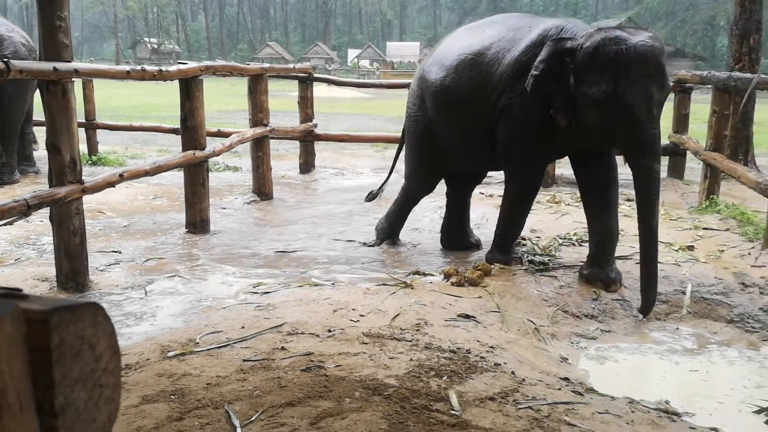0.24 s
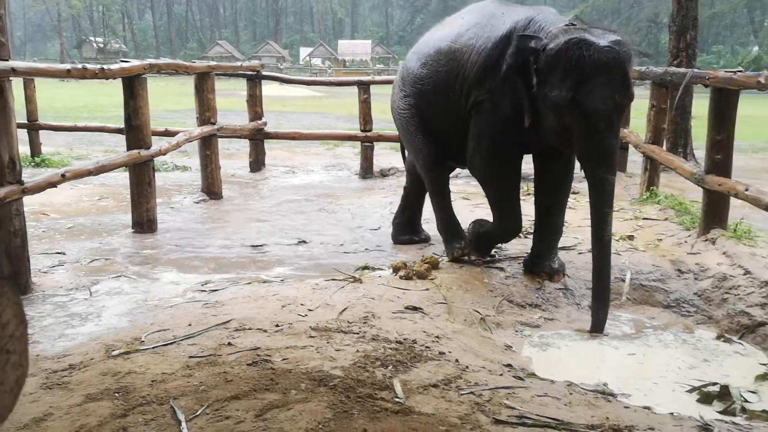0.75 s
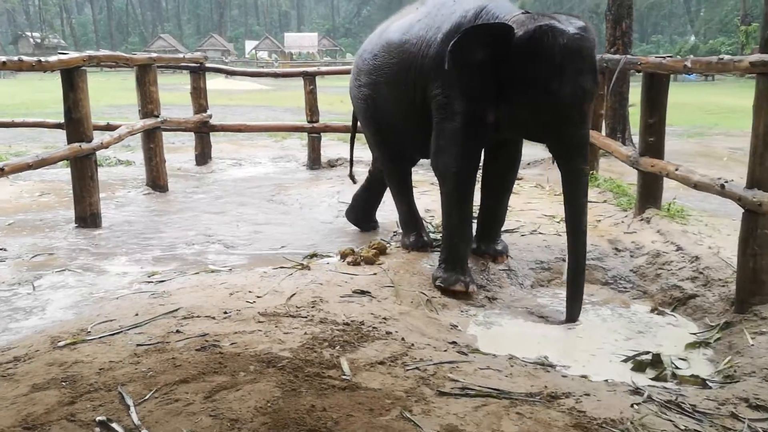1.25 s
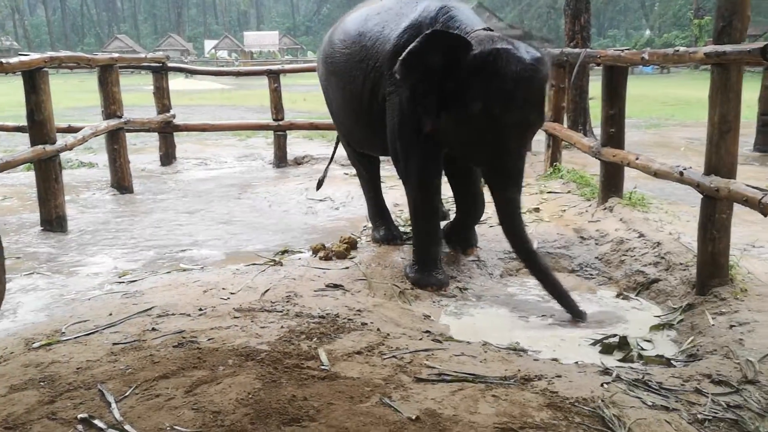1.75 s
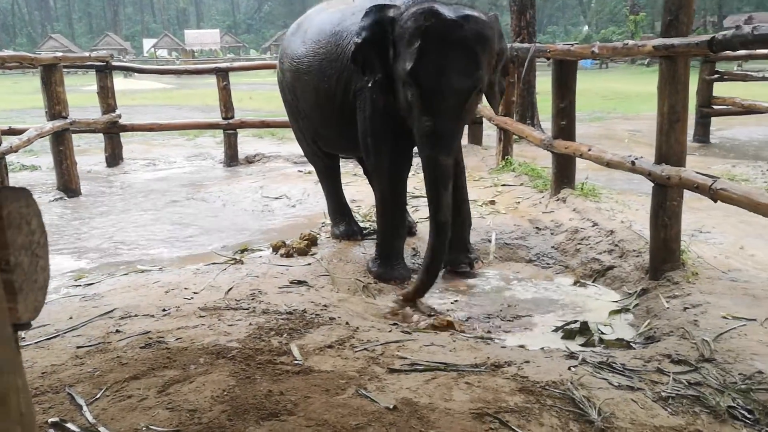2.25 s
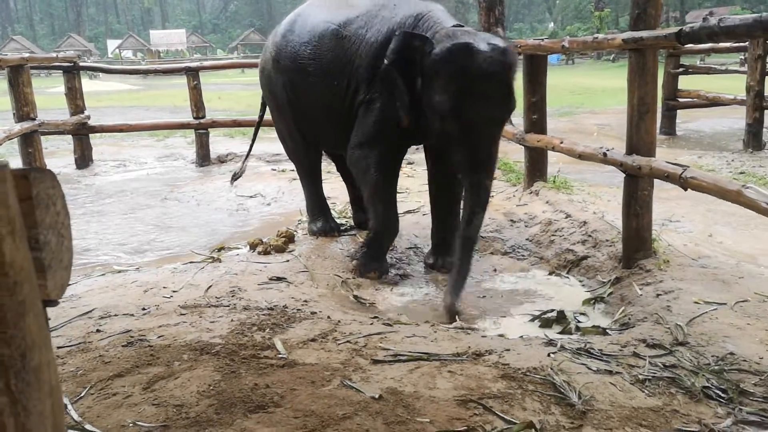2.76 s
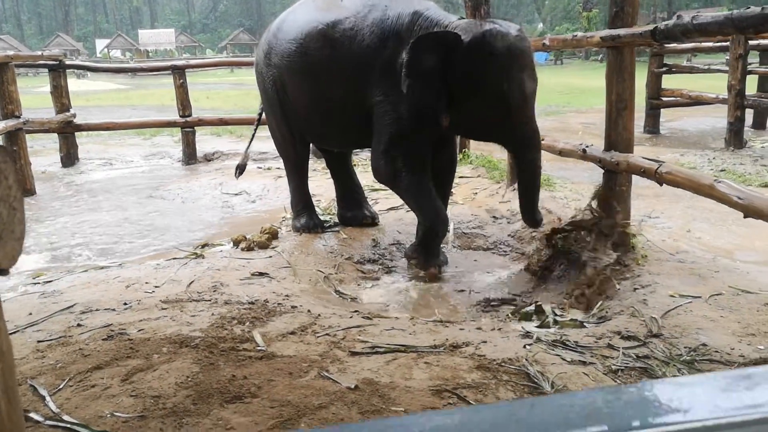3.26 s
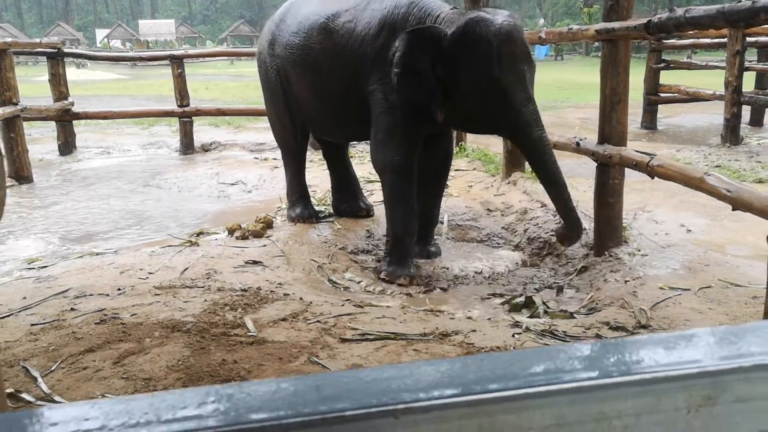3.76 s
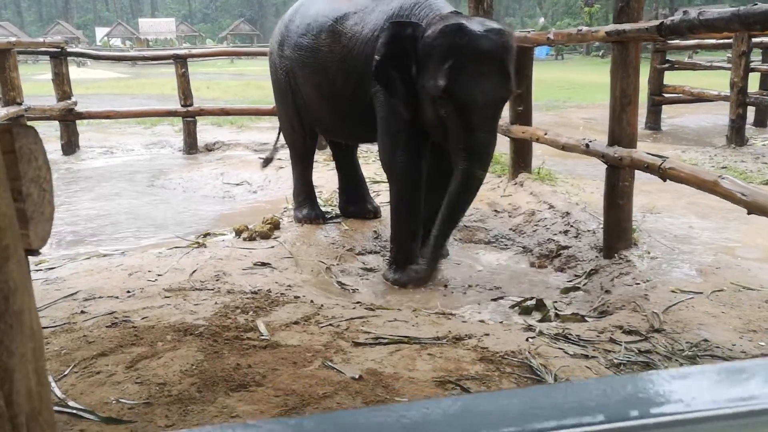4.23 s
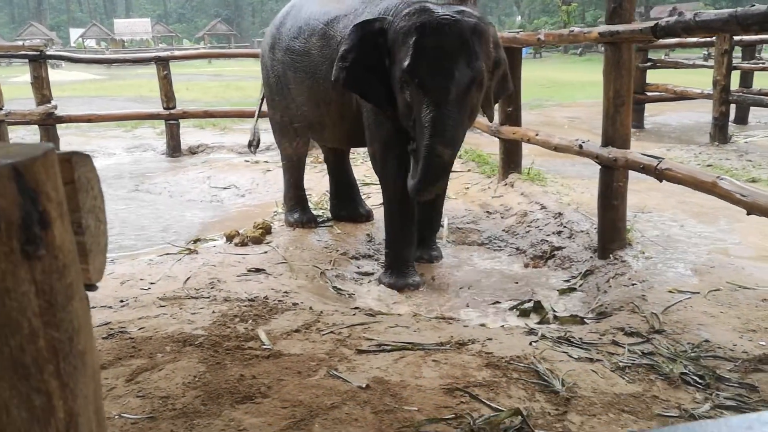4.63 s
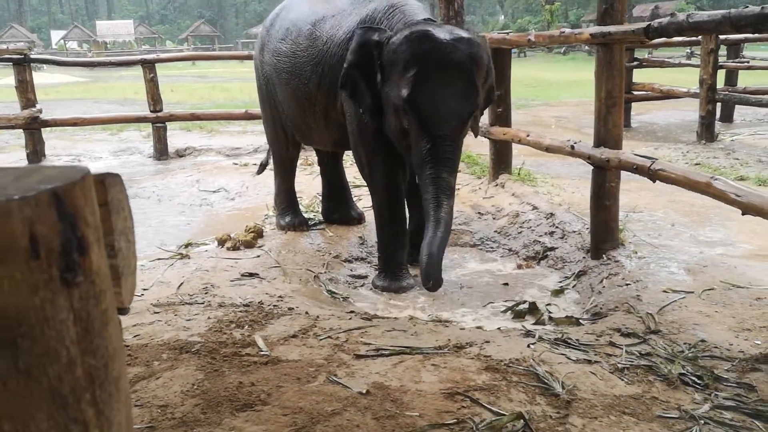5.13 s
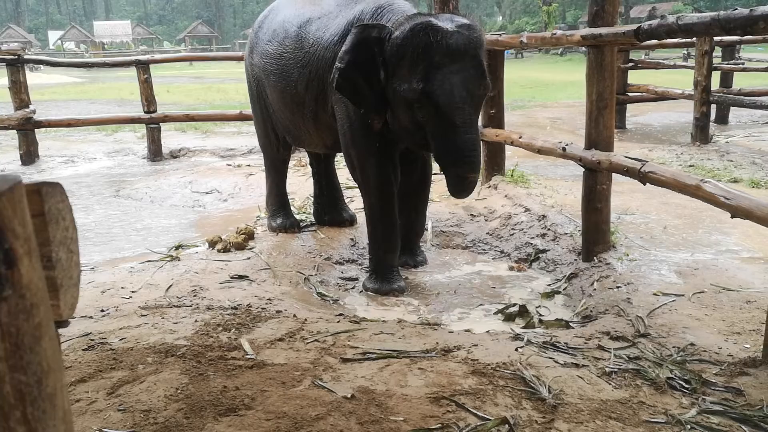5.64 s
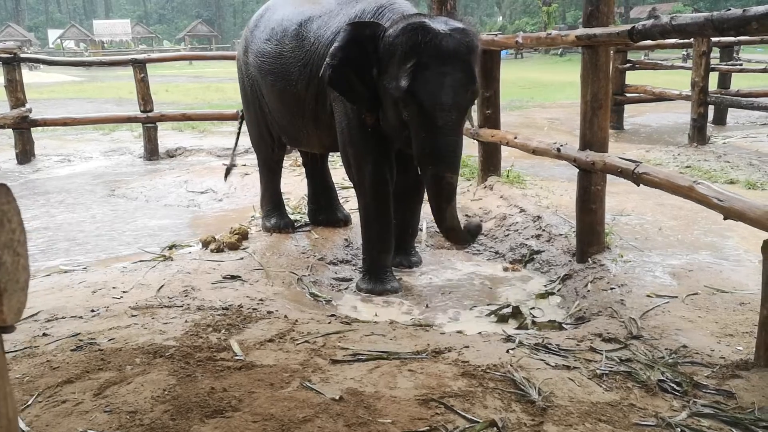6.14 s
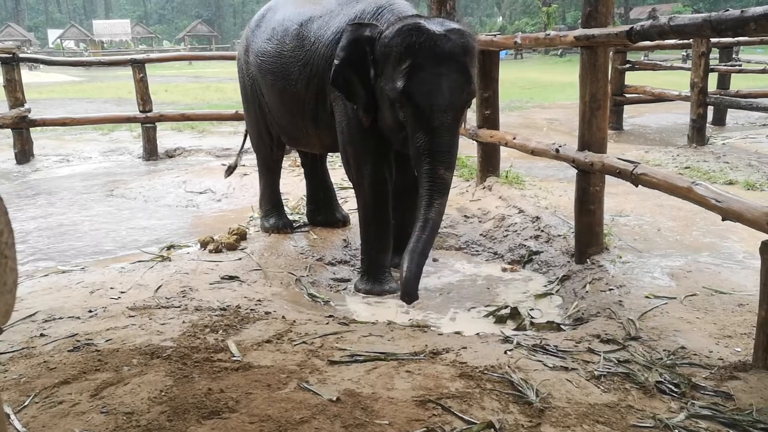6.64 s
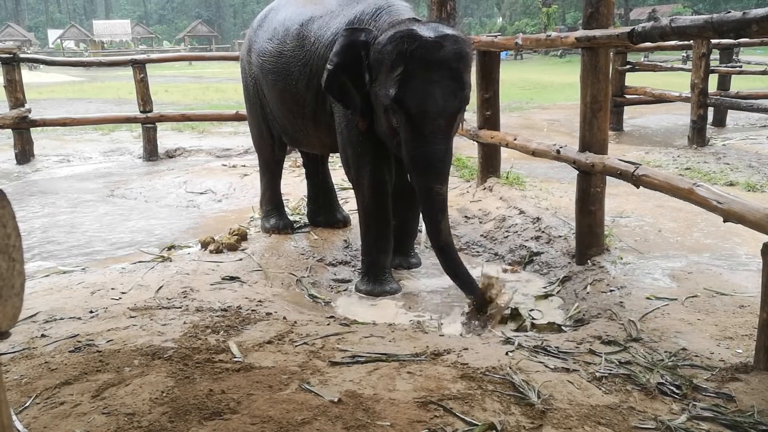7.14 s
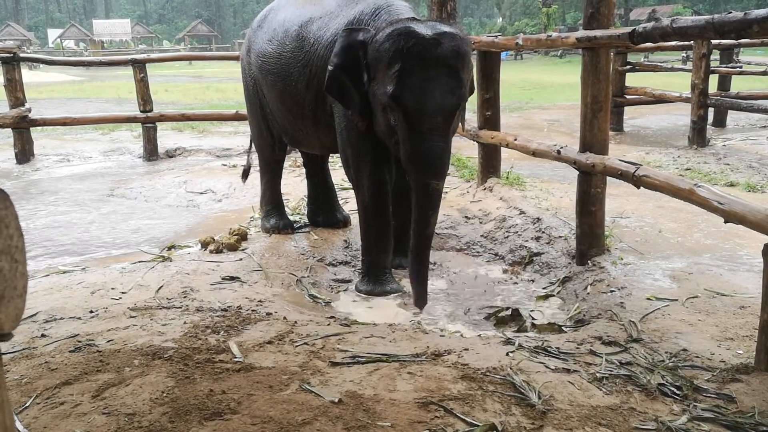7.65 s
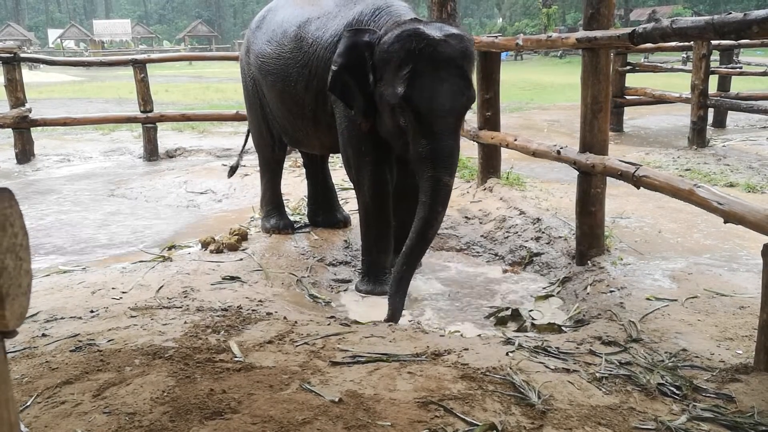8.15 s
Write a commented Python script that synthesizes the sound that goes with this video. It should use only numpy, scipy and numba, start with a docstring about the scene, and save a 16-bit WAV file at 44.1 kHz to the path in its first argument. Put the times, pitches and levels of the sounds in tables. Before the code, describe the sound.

Even rainfall on wet muddy ground, crackling close drops and soft mud plops, over a constant engine hum and unsteady deep rumble.

```python
"""Steady rain hisses on mud and puddles, over a generator hum and an unsteady low rumble.
Coloured noise makes the far rain; clusters of short dying sines make the near patter and the splats.
Single plops, soft mud thuds and a few pitched plinks stand out; they too are bursts of dying sines.
The six-cylinder generator is a sum of shaft-rate harmonics, the rumble three bands of noise.
A phone with two ports hears it all from under a shelter."""
import sys
import numpy as np
from scipy import signal
from scipy.fft import rfft, irfft, next_fast_len
from scipy.io import wavfile
from scipy.ndimage import uniform_filter1d
from numba import njit

SR = 44100
rng = np.random.default_rng(int(sys.argv[2]) if len(sys.argv) > 2 else 0)


def wrap_up_sound(samples):
    """Save the sound to the file named by the first command line argument, as 16-bit audio."""
    columns = np.atleast_2d(samples).T
    # keep every value between -1 and 1, then stretch to whole-number steps
    tamed = np.clip(columns, -1, 1)
    steps = np.round(tamed * 32767).astype(np.int16)
    wavfile.write(sys.argv[1], SR, steps)


N = 369999  # length in samples

# colour of the rain through the phone's ports: [f/Hz, relative level/dB]
RAIN_COLOUR = [(240, -21), (340, -11), (577, -12.5), (957, -5.5), (1420, -6), (2190, 0), (2670, -1.5),
               (3250, -6.5), (3620, -7), (7790, -1), (9350, -5), (11800, -19), (13100, -16.5), (14600, -23),
               (15500, -31)]
# balance of the ports for rain: [f/Hz, left minus right level/dB]
PORT_BALANCE = [(400, -.5), (700, -1.1), (1300, -3), (2400, -5), (4400, -2.3), (8000, .5), (11500, -.5),
                (14000, -.9)]
# multiples of the generator's shaft rate: [multiple, rms level/dB, left lead/rad]
HARMONICS = [(2, -54, -.05), (3, -31.1, -.07), (4, -56, -.2), (7, -65, -.4), (8, -66, -.4), (9, -58, -.4),
             (10, -66, -.3), (12, -67, -.2), (15, -70, -.2)]
# second firing harmonic, which swells and sinks: [t/s, rms level/dB]
FIRING_OVERTONE = [(0.0, -53), (0.04, -41.5), (2.1, -38), (2.41, -39), (3.34, -37.5), (3.39, -35),
                   (3.72, -40), (3.79, -35), (4.84, -40), (7.71, -41.5), (8.34, -39.5), (8.39, -43)]
# unsteady low rumble: [t/s, deep band level/dB, middle band level/dB, upper band level/dB]
RUMBLE_LEVELS = [(0.0, -39, -55, -48), (0.04, -37, -44, -56), (0.21, -39, -53, -47), (0.28, -46, -44, -56),
                 (0.33, -32, -45, -49), (0.54, -44, -52, -50.5), (0.65, -39, -45, -53),
                 (0.72, -37, -55, -50), (0.86, -41, -45, -48), (0.89, -52, -59, -54),
                 (1.05, -30.5, -41, -50), (1.52, -47, -53, -51.5), (1.78, -38, -50, -45.5),
                 (1.82, -42, -60, -50), (1.87, -45, -53, -50), (2.41, -49, -51, -47.5),
                 (2.48, -31, -46, -52), (2.55, -43, -50, -57), (2.59, -42, -46, -46),
                 (2.71, -32.5, -45, -53), (2.85, -45, -48, -47), (3.04, -31.5, -37, -52),
                 (3.35, -34, -39, -48.5), (3.62, -39, -43, -44.5), (3.76, -40, -32, -45),
                 (3.83, -45, -62, -42), (3.88, -39, -43, -43), (4.11, -42, -51, -49), (4.19, -34, -42, -42),
                 (4.4, -43, -53, -47.5), (4.88, -41, -51, -47), (5.09, -41, -39, -49),
                 (5.14, -41, -53, -49), (6.05, -41, -45, -50.5), (6.29, -34, -42, -51),
                 (6.55, -41, -48, -51.5), (7.74, -43, -48, -50.5), (8.11, -41, -44, -51),
                 (8.16, -36, -56, -49), (8.23, -35, -43, -53), (8.39, -42, -50, -49)]
# rumble bands: [centre f/Hz, width f/Hz, opposed noise relative to shared noise]
RUMBLE_SHAPES = [(35, 86, 0.13), (100, 95, 0.39), (203, 247, 0.24)]
# big drops slapping wet ground nearby:
# [t/s, peak level/dB, centre f/Hz, left minus right level/dB, mean droplet delay/ms]
BIG_SPLATS = [(0.1102, -21.0, 5430.0, -2, 1.7), (0.5089, -19, 5910.0, -3, 2.1),
              (0.5511, -20.0, 7490.0, 1, 1.1), (0.8506, -16.5, 7460.0, 6, 2.6),
              (0.8762, -23.0, 7210.0, 4, 3.8), (0.9068, -20, 5890.0, 0, 5.7),
              (0.9625, -17.5, 5500.0, 0, 1.9), (1.1557, -24, 7680.0, 8, 0.8),
              (1.3459, -13, 5850.0, -3, 2.0), (1.3637, -23, 7060.0, 2, 2.5),
              (1.4412, -22.0, 7850.0, 2, 2.0), (1.5074, -20.0, 7260.0, 4, 1.3),
              (1.5863, -14.0, 6840.0, -1, 1.1), (1.7312, -22.0, 7390.0, 5, 2.3),
              (1.9192, -21, 7540.0, -3, 1.5), (1.9802, -20.0, 6940.0, 0, 1.4), (2.025, -14, 6850.0, 1, 2.0),
              (2.2065, -21.0, 5780.0, 1, 3.9), (2.3628, -12.5, 6000, -3, 2.8), (2.425, -15, 6630, -7, 1.4),
              (2.5628, -22.0, 5540.0, -3, 3.7), (2.5832, -23.0, 7030.0, 6, 0.9),
              (2.6056, -19, 7020.0, -4, 1.6), (2.6546, -24, 6600.0, 0, 2.3),
              (2.9948, -16.5, 6950.0, -4, 1.8), (3.1427, -20.0, 7270.0, -4, 1.9),
              (3.1528, -23, 6270.0, -4, 2.5), (3.2994, -21, 6130.0, -1, 2.7), (3.4949, -20, 5420.0, 1, 1.7),
              (3.6182, -18, 7060, 0, 6.3), (3.6521, -21.0, 6940.0, 0, 3.3), (3.68, -21, 6710.0, -4, 2.2),
              (3.6975, -17, 7500.0, 8, 0.8), (3.7434, -22, 7650.0, 6, 1.5),
              (3.8526, -23.0, 6100.0, -4, 2.4), (3.9138, -19, 6850.0, -3, 4.5),
              (3.941, -20.0, 6370.0, -2, 1.6), (3.9874, -23.0, 6080.0, -3, 2.3),
              (4.0496, -21.0, 5900.0, -2, 0.9), (4.0655, -22, 7320.0, 8, 2.5),
              (4.1818, -19, 7640.0, 2, 0.9), (4.3123, -22.0, 8060.0, 2, 1.9),
              (4.3763, -23.0, 6220.0, -9, 2.1), (4.4363, -18, 7580.0, 4, 2.4),
              (4.5512, -20, 6890.0, -4, 0.8), (4.5694, -21.0, 7490.0, 4, 1.7),
              (4.6371, -20.5, 5520.0, 1, 2.4), (4.6524, -19, 6530.0, 3, 2.3), (4.6907, -22, 7910.0, 9, 1.4),
              (4.7856, -21, 5620.0, -8, 1.3), (4.8068, -21, 6100.0, 0, 2.6), (4.9037, -20, 6900.0, 2, 2.4),
              (4.9185, -18, 7030.0, 1, 2.3), (4.9436, -22.0, 7190.0, 5, 1.0), (5.0761, -22, 6160.0, 3, 2.1),
              (5.0828, -22.0, 7000.0, 0, 3.0), (5.0952, -19.0, 6350.0, 1, 2.3),
              (5.1061, -20, 5640.0, -1, 2.1), (5.2241, -19.5, 7510.0, 2, 3.1),
              (5.2873, -19.0, 6590.0, -5, 1.8), (5.7067, -21, 7470.0, -1, 1.4),
              (5.8223, -22.0, 6380.0, 1, 0.9), (5.8462, -22.0, 5950.0, 2, 2.8),
              (5.8614, -16, 8580.0, -3, 2.2), (6.0227, -18, 7920.0, 4, 1.2), (6.0452, -19, 8190.0, -7, 1.2),
              (6.1845, -21.0, 6790.0, -4, 3.7), (6.2432, -24.0, 6010.0, -8, 3.7),
              (6.2769, -23, 7690.0, -4, 0.8), (6.4252, -19, 7260.0, 2, 1.8),
              (6.5047, -21.0, 6880.0, 3, 0.9), (6.5455, -24, 6870.0, 2, 0.9), (6.6046, -23, 8250.0, 1, 0.8),
              (6.6644, -10.5, 7060.0, 3, 0.8), (6.7604, -19, 7800.0, -6, 1.2),
              (6.7667, -25, 7400.0, 0, 3.8), (6.9723, -21, 7620.0, 1, 5.5), (6.9769, -23.0, 7710.0, 7, 3.2),
              (7.0144, -26, 7340.0, 4, 1.7), (7.0663, -22.0, 7310.0, 4, 0.7), (7.078, -28, 7430.0, 9, 2.7),
              (7.1218, -21.0, 6460.0, -4, 1.5), (7.1807, -21.0, 7000.0, 2, 0.9),
              (7.1987, -22.0, 6600.0, 5, 2.1), (7.2709, -20.0, 5780.0, 0, 1.7),
              (7.2791, -21, 7340.0, 5, 1.6), (7.2904, -18, 6720.0, 1, 2.2),
              (7.3274, -20.0, 6180.0, -6, 2.7), (7.3406, -21.0, 7200.0, 2, 1.6),
              (7.4463, -22.0, 7070.0, 3, 1.0), (7.4587, -23, 8060.0, -1, 0.9),
              (7.5592, -12.5, 7690.0, 3, 1.7), (7.5711, -15, 7260.0, 0, 1.3), (7.7269, -16, 6530.0, 0, 4.4),
              (7.7797, -22.0, 6280.0, -1, 4.7), (7.8111, -20.0, 5050.0, 0, 1.8),
              (7.8766, -16, 5280.0, -10, 1.0), (8.002, -23, 7480.0, 6, 1.7),
              (8.0632, -17.5, 7050.0, 1, 1.8), (8.1073, -18, 8390.0, -4, 3.2),
              (8.1672, -21.0, 6950.0, -2, 1.7), (8.2755, -21.0, 5760.0, -3, 1.7)]
# dull drips and mud plops: [t/s, peak level/dB, centre f/Hz]
MUD_PLOPS = [(0.203, -22, 2680), (0.347, -25, 2450), (1.43, -24, 2170), (1.601, -19, 2200),
             (1.715, -25.5, 1730), (2.199, -22, 1530), (2.239, -23.5, 1580), (2.519, -25, 2440),
             (2.953, -21.5, 1670), (2.976, -19.5, 1760), (3.034, -16.5, 2800), (3.077, -24.5, 1660),
             (3.407, -23, 2480), (3.433, -23.5, 2210), (3.465, -27, 1620), (3.541, -26, 1830),
             (3.58, -18.5, 2300), (3.608, -19, 2380), (3.656, -16, 2570), (3.718, -19.5, 1910),
             (3.941, -14.5, 1800), (4.062, -23, 2420), (4.073, -24, 1600), (4.109, -20, 2100),
             (4.137, -21, 2380), (4.165, -19.5, 2070), (4.208, -23, 1350), (4.214, -21.5, 1890),
             (4.27, -12.5, 2300), (4.397, -22, 1510), (4.488, -14.5, 2240), (4.786, -19, 1800),
             (4.833, -23, 1800), (4.868, -23, 1500), (4.88, -23, 1500), (4.889, -24, 1300),
             (4.932, -24, 2030), (4.997, -19.5, 1600), (5.431, -25, 1480), (5.64, -23.5, 2530),
             (5.9, -19.5, 1600), (6.032, -25, 1500), (6.25, -24.5, 1500), (6.352, -21, 1370),
             (6.534, -26.5, 1850), (6.766, -24.5, 1750), (7.537, -16.5, 2160), (7.591, -27.5, 1750),
             (7.855, -22, 2170), (8.191, -25, 1940), (8.33, -20, 2080)]
# soft thuds of mud: [t/s, nominal level/dB]
MUD_THUDS = [(0.807, -39), (3.711, -38), (3.937, -32), (4.208, -41)]
# drops that trap air and ring near one pitch: [t/s, peak level/dB, pitch f/Hz]
AIR_PLINKS = [(2.008, -33, 830), (3.384, -22, 2130), (4.637, -29, 3760), (4.641, -17.5, 2550)]

# steady rain below and above the split; one passing swell, weaker in the treble
BODY_DB, TREBLE_DB, SPLIT_HZ = -35.5, -35.5, 3330
SWELL_S, SWELL_WIDTH_S, SWELL_DB, SWELL_TREBLE_SHARE = 3.57, 0.26, 2.5, 0.43
FLURRY_DB = 1.3  # how far the patter wanders
SHAFT_HZ = 24.96  # three firings a turn
PULSE_SKEW_RAD = .5  # harmonics lag by this times squared distance from the firing rate, tilting each pulse
DRIP_PAN_DB = -7.5  # left minus right, for plops and plinks
TOP_HZ = 15400  # edge of the phone's treble cut


def undb(db):
    """Decibels to amplitude."""
    return 10 ** (np.asarray(db) / 20)


def unit(x):
    """Scale to an rms of one over all ports."""
    return x / np.sqrt(np.mean(x ** 2))


def curves(table):
    """Columns of a table, joined by straight lines in time."""
    s, *columns = np.transpose(table)
    return [np.interp(np.arange(N) / SR, s, column) for column in columns]


def on_log_hz(table, hz):
    """Read a frequency table along straight lines in log frequency."""
    f, value = np.transpose(table)
    return np.interp(np.log(np.maximum(hz, 1)), np.log(f), value)


def shaped(x, gain):
    """Filter by a gain given as a function of frequency."""
    size = next_fast_len(N)
    hz = np.arange(size // 2 + 1) * SR / size
    return irfft(rfft(x, size) * gain(hz), size)[..., :N]


def walk(rate):
    """Random levels held 1 / rate s and slewed twice; spread near 1."""
    k = int(SR / rate)
    steps = np.repeat(rng.standard_normal(N // k + 1), k)
    return 1.36 * uniform_filter1d(uniform_filter1d(steps, k), k)[:N]


@njit
def add_grains(out, start, hz, cycles, size):
    """Each grain is a sine that dies by 1/e in the given number of cycles."""
    for g in range(len(start)):
        turn = np.exp((2j * np.pi - 1 / cycles) * hz[g] / SR)
        z = size[g] + 0j
        end = min(len(out), start[g] + int(6 * cycles * SR / hz[g]))
        for i in range(max(start[g], 0), end):
            out[i] += z.imag
            z *= turn


def splat(s, db, hz, pan_db, octaves, length, cycles, count, grain_db=0, pull_share=.5):
    """A drop bursts into droplets: grains build fast and thin out, drawn anew at each port.

    length is the mean delay in s, octaves the pitch spread each way, pull_share the share starting inward.
    """
    out = np.zeros((2, N))
    for port, side in enumerate((.5, -.5)):
        chance = rng.random((len(s), count, 4))
        # two waiting times in a row give the quick build and the long tail
        late = -np.log((1 - chance[..., 0]) * (1 - chance[..., 3])) / 2
        ratio = 2 ** (np.reshape(octaves, (-1, 1)) * (2 * chance[..., 1] - 1))
        pitch = np.minimum(hz[:, None] * ratio, .4 * SR)
        level = undb(db + grain_db + side * pan_db)[:, None]
        push = np.sign(chance[..., 2] - pull_share)
        # higher grains ring more briefly, so they start stronger
        size = level * push * ratio ** 1.02
        start = ((s[:, None] + np.reshape(length, (-1, 1)) * late) * SR).astype(np.int64)
        add_grains(out[port], start.ravel(), pitch.ravel(), 1. * cycles, size.ravel())
    return out


def patter(count, low_hz, high_hz, scatter_db, largest_db, length, octaves, cycles):
    """Random drops: many small, few large, some mere ticks, some spread-out splashes."""
    when, pitch, size, side, spread = rng.random((count, 5)).T
    hz = low_hz * (high_hz / low_hz) ** pitch
    db = np.minimum(-scatter_db * np.log(1 - size), largest_db)
    db = db + 4 * np.log2(hz / low_hz)
    pan_db = 8 * (side - .5)
    delay = length * 6 ** (spread - .5)
    return unit(splat(when * N / SR, db, hz, pan_db, octaves, delay, cycles, count=12))


def rain():
    """Far hiss and near patter share the colour of the ports; the patter comes in flurries."""
    hiss = rng.standard_normal((2, N)) * undb(0.76 * walk(5))
    bright = patter(count=1900, low_hz=4160, high_hz=12500, scatter_db=3.0, largest_db=6.5,
                    length=.003, octaves=0.43, cycles=2.44)
    dull = patter(count=1800, low_hz=730, high_hz=3100, scatter_db=4.0, largest_db=7.5,
                  length=.0018, octaves=0.61, cycles=0.96)
    bright = undb(-4.3 + FLURRY_DB * walk(4.99)) * bright
    dull = undb(-12.5 + FLURRY_DB * walk(5)) * dull

    def port_colour(hz):
        """Shared colour, with the balance split evenly between left and right."""
        return undb(on_log_hz(RAIN_COLOUR, hz) + np.outer([.5, -.5], on_log_hz(PORT_BALANCE, hz)))

    sound = shaped(hiss + bright + dull, port_colour)
    body = shaped(sound, lambda hz: 1 / (1 + (hz / SPLIT_HZ) ** 6))
    treble = sound - body
    from_swell = (np.arange(N) / SR - SWELL_S) / SWELL_WIDTH_S
    swell_db = SWELL_DB * np.exp(-.5 * from_swell ** 2)
    body_gain = undb(BODY_DB + swell_db)
    treble_gain = undb(TREBLE_DB + SWELL_TREBLE_SHARE * swell_db)
    return body_gain * unit(body) + treble_gain * unit(treble)


def generator():
    """Steady multiples of the shaft rate that waver a little on the way through the air."""
    turn = 2 * np.pi * SHAFT_HZ * np.arange(N) / SR + 0.1 * walk(1.487)
    overtone = (6, curves(FIRING_OVERTONE)[0], -.4)
    out = 0
    for k, db, lead in [*HARMONICS, overtone]:
        port_phase = np.array([[lead], [-lead]]) / 2
        lag = PULSE_SKEW_RAD * (k / 3 - 1) ** 2
        # higher multiples waver more
        level = np.sqrt(2) * undb(db + 0.12 * k * walk(1.64))
        out = out + level * np.cos(k * turn - lag + port_phase)
    return out


def rumble():
    """Low noise in three overlapping bands of unsteady level, nearly alike at both ports."""
    out = 0
    for db, (centre_hz, width_hz, unlike) in zip(curves(RUMBLE_LEVELS), RUMBLE_SHAPES):
        mid, side = rng.standard_normal((2, N))
        noise = mid + unlike * np.outer([1, -1], side)

        def resonance(hz):
            """Gain that falls away on both sides of the centre."""
            offset = (hz - centre_hz ** 2 / np.maximum(hz, 1)) / width_hz
            return 1 / (1 + offset ** 2) ** 1.45

        out = out + undb(db + 1.7 * walk(9)) * unit(shaped(noise, resonance))
    return out


def placed(s, db, hz, pan_db, colour, **burst):
    """Single drops: each burst is coloured, brought to its own peak at each port and set at its time."""
    slot, lead, count = 2048, 128, len(s)  # samples per drop, samples ahead of its start, drops
    starts = (np.arange(count) * slot + lead) / SR
    # render the drops in a row, one to a slot, so each can be levelled alone
    row = splat(starts, np.zeros(count), hz, 0, **burst)
    drops = shaped(row, colour)[:, :count * slot].reshape(2, count, slot)
    peak = undb(db + np.outer([.5, -.5], pan_db))
    drops = drops * (peak / np.abs(drops).max(axis=2))[..., None]
    out = np.zeros((2, N + 2 * slot))
    for k, at in enumerate((s * SR).astype(int) + slot - lead):
        out[:, at:at + slot] += drops[:, k]
    return out[:, slot:slot + N]


def splats():
    """Loud crackling drops; the ports lose the top and the wet ground gives them little bass."""
    s, db, hz, pan_db, spread_ms = np.transpose(BIG_SPLATS)
    return placed(s, db, hz, pan_db,
                  lambda hz: 1 / (1 + (hz / 10500) ** 5) / (1 + (2600 / (hz + 1)) ** 4),
                  octaves=0.45, length=spread_ms / 1000, cycles=2.8, count=30)


def plops():
    """A plop pushes the air outward in two quick pulses, further apart on average when quieter."""
    s, db, hz = np.transpose(MUD_PLOPS)
    return placed(s, db, hz, DRIP_PAN_DB,
                  lambda hz: 1 / (1 + (hz / 3900) ** 4) / (1 + (800 / (hz + 1)) ** 4),
                  octaves=0.25, length=.0007 * undb(-1.9 * (db + 21)), cycles=0.38, count=2, pull_share=0)


def thuds():
    """Heavy mud lands softly: a few low grains, alike at both ports."""
    s, db = np.transpose(MUD_THUDS)
    sound = splat(s, db, np.full(len(s), 290.), 0, octaves=0.78, length=0.0063,
                  cycles=2.3, count=24, grain_db=-8.0)[0]
    return shaped(sound, lambda hz: 1 / (1 + (hz / 700) ** 4))


def plinks():
    """Trapped air rings near one pitch: closely tuned grains that all start outward."""
    return placed(*np.transpose(AIR_PLINKS), DRIP_PAN_DB, lambda hz: 1 / (1 + (400 / (hz + 1)) ** 4),
                  octaves=0.12, length=.0011, cycles=4.5, count=8, pull_share=0)


def scene():
    """Sum of all layers at the two ports."""
    return rain() + generator() + rumble() + splats() + plops() + thuds() + plinks()


def record(dry):
    """The phone cuts the top with a steep low-pass."""
    top_cut = signal.ellip(10, .2, 70, TOP_HZ, fs=SR, output="sos")
    return signal.sosfilt(top_cut, dry)


dry = scene()
out = record(dry)
wrap_up_sound(out)
```